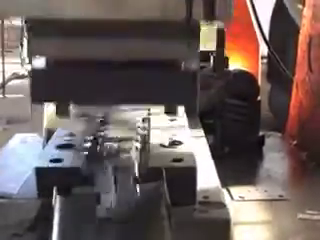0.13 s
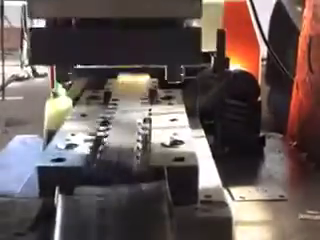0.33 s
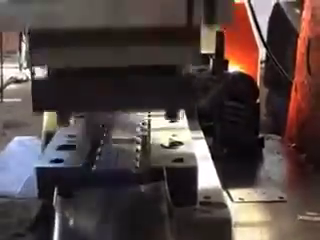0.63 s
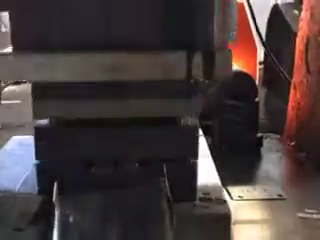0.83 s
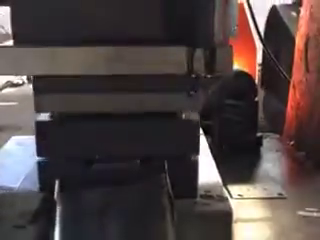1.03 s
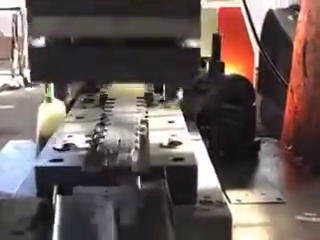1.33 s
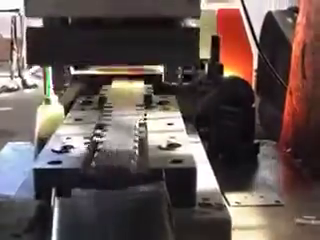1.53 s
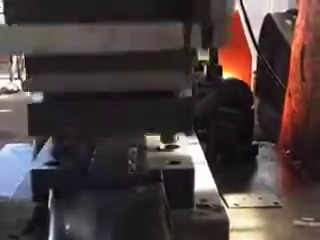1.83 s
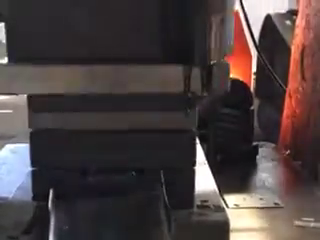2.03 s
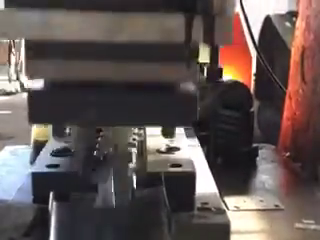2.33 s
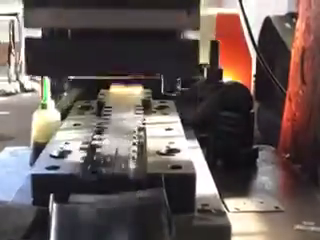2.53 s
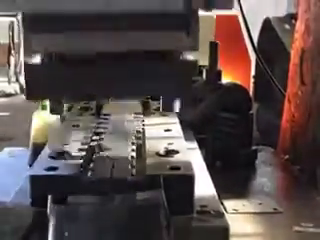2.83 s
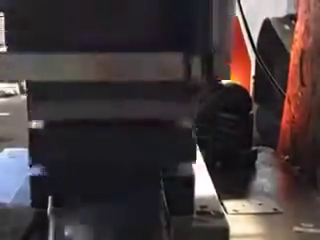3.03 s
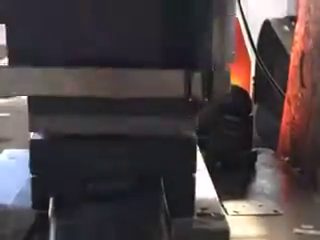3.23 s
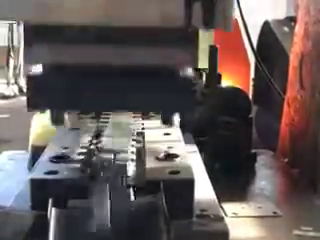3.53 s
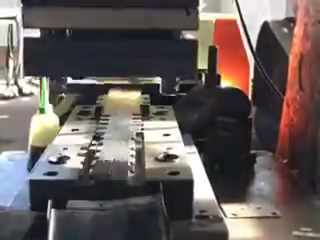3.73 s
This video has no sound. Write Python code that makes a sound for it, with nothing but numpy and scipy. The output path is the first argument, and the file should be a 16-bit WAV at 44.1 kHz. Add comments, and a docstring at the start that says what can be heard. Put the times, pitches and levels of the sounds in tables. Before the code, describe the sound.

A stamping press pounds rapidly, ram thudding and metal clanking, in a loud, echoing workshop.

```python
"""A loud workshop hall, close to a stamping press: the ram thuds into the die, linkages clank, punches and
feeder tick, small parts clink. These are bursts of noise in resonances that strike the modes of the steel.
Gears rattle under load as dense random clicks; late on, an air jet blows off as hiss and a falling whistle.
Shop din and motor whine are filtered noise. The hall smears the press, and a small microphone's fast
limiter holds the peaks down."""
import sys
import numpy as np
from scipy import signal
from scipy.io import wavfile
from scipy.ndimage import uniform_filter1d, minimum_filter1d

SR = 44100
rng = np.random.default_rng(int(sys.argv[2]) if len(sys.argv) > 2 else 0)


def dump_mix(stems):
    """Bounce the given channels to the path in sys.argv[1] as a 16-bit WAV at rate SR."""
    frames = np.atleast_2d(stems).T  # one column per channel
    limited = np.clip(frames, -1, 1)  # hard clip at full scale
    pcm = np.round(limited * 32767).astype(np.int16)
    wavfile.write(sys.argv[1], SR, pcm)


def invert_db(x):
    """Field ratio 10**(x/20) for x, a level in decibels (scalar or array-like)."""
    u = np.asarray(x, float) / 20
    return 10 ** u


N = 171990

# Modes of frame and die. Each row: pitch in Hz, relative level in dB, ring time to -60 dB in s.
STEEL_MODES = [(245.5, -4, 0.18), (372.1, -12.5, 0.21), (606, -8, 0.1), (699, -10.5, 0.065),
               (811, -31, 0.066), (1190, -18.5, 0.055), (1261, -13.5, 0.098), (1717, -11.5, 0.054),
               (1936, -23, 0.15), (2850, -15.5, 0.021), (3560, -14.5, 0.057), (4990, -23, 0.17),
               (6045, -27, 0.13)]


def rms_one(x):
    """Scale to rms 1."""
    return x / np.sqrt(np.mean(x ** 2) + 1e-20)


def in_time(rows):
    """Columns of a table as curves over all samples, level before the first row and after the last."""
    s, *columns = np.transpose(rows)
    return [np.interp(np.arange(N) / SR, s, c) for c in columns]


def drift(corner_hz):
    """Slow random wander of rms 1: noise through two equal poles, run at a 40th of the sample rate."""
    r = np.exp(-2 * np.pi * corner_hz * 40 / SR)
    noise = rng.standard_normal(N // 40 + 2002)
    slow = signal.lfilter([1], [1, -2 * r, r * r], noise)[2000:]  # settled part only
    return np.interp(np.arange(N) / 40, np.arange(len(slow)), rms_one(slow))


def lowpass(x, order, hz):
    """Butterworth low-pass."""
    return signal.sosfilt(signal.butter(order, hz, fs=SR, output="sos"), x)


def bandpass(x, low_hz, high_hz):
    """Butterworth band-pass."""
    return signal.sosfilt(signal.butter(2, [low_hz, high_hz], "band", fs=SR, output="sos"), x)


def resonance(x, hz, width_hz):
    """Two-pole peak of gain 1."""
    r = np.exp(-np.pi * width_hz / SR)
    return signal.lfilter([(1 - r * r) / 2, 0, (r * r - 1) / 2],
                          [1, -2 * r * np.cos(2 * np.pi * hz / SR), r * r], x)


def ring(clicks, hz, t60):
    """A unit click sets a dying sine of starting height 1 ringing."""
    r, w = invert_db(-60 / (t60 * SR)), 2 * np.pi * hz / SR
    return signal.lfilter([0, np.sin(w)], [1, -2 * r * np.cos(w), r * r], clicks + 1e-18)


def coloured(sources, spectrum, patchy_db):
    """Third-octave bands of two sources in turn, each with its level and flicker; rms 1 in all."""
    out = 0
    edges = 40 * 2 ** np.arange(0, 7.8, 1 / 3)
    hz, db = np.transpose(spectrum)
    for k, (low, high) in enumerate(zip(edges, edges[1:])):
        band = bandpass(sources[k % 2], low, high)
        band_db = np.interp(np.log(low * high) / 2, np.log(hz), db)
        out = out + band * invert_db(band_db + patchy_db * drift(10))
    return rms_one(out)


def blows(rows, t60, attack_s, width, boost_db, reach_oct):
    """Each blow is a dying chatter of contacts in a resonance and strikes the steel modes near its pitch."""
    steel_db, uneven_db = 1.5, 0.81
    out, t = np.zeros(N + SR), np.arange(SR // 2) / SR
    strikes = np.zeros((len(STEEL_MODES), N + SR))
    shape = (1 - np.exp(-t / attack_s)) * invert_db(-60 * t / t60)
    for s, db, hz in rows:
        chatter = rng.standard_normal(len(t)) * invert_db(2.2 * rng.standard_normal(len(t)))
        burst = shape * resonance(resonance(chatter, hz, width * hz), hz, width * hz)
        same_energy = np.sqrt(np.sum(shape ** 2) / np.sum(burst ** 2))
        i = int(s * SR)
        out[i:i + len(t)] += invert_db(db + boost_db) * burst * same_energy
        far = np.log2(np.array(STEEL_MODES)[:, 0] / hz) / reach_oct
        mode_db = db + steel_db + rng.normal(0, uneven_db, len(STEEL_MODES))
        strikes[:, i] += invert_db(mode_db) * np.exp(-far ** 2 / 2)
    steel = sum(invert_db(db) * ring(hit[:N], hz, rings_s)
                for hit, (hz, db, rings_s) in zip(strikes, STEEL_MODES))
    return out[:N] + steel


def shop_din():
    """Distant machines blur into noise whose bands flicker."""
    # Each row: frequency in Hz, relative density in dB per Hz.
    din_spectrum = [(50, -30.5), (200, 5), (300, -0.5), (700, -6.5), (1300, -7.5), (2450, -10.5),
                    (3600, -10), (4600, -19), (7500, -30)]
    return invert_db(-24) * coloured(rng.standard_normal((2, N)), din_spectrum, patchy_db=4.0)


def motor_whine():
    """Motors nearby whine steadily: noise in narrow resonances."""
    # Each row: pitch in Hz, level in dB.
    whine_tones = [(700, -33.5), (1267, -47)]
    return sum(invert_db(db) * rms_one(resonance(rng.standard_normal(N), hz, width_hz=12))
               for hz, db in whine_tones)


def jingle():
    """Loose scrap and strip edges jingle at random, at pitches spread over the treble; rms 1."""
    per_s, ring_cycles = 580, 100
    strength = invert_db(3.0 * np.minimum(rng.exponential(1, N), 2.5))
    born = strength * (rng.random(N) < per_s / SR)
    pitches_hz = np.geomspace(1500, 6800, 24)
    dealt = rng.integers(0, 24, N)  # which pitch each click sets ringing
    return rms_one(sum(ring(born * (dealt == k), hz, ring_cycles / hz) / np.sqrt(hz)
                       for k, hz in enumerate(pitches_hz)))


def drive():
    """Gear teeth rattle as dense, clumped contacts under load and keep the lower steel modes humming."""
    # Load on the drive. Each row: time in seconds, level of rattle, hum and jingle in dB.
    load_curve = [(0, -9), (.17, -21.5), (.28, -24.5), (.85, -25.5), (.92, -12), (1.3, -18), (1.5, -31.5),
                  (1.75, -19), (2.05, -18), (2.42, -14.5), (2.52, -33), (2.72, -30), (2.9, -16),
                  (3.04, -21), (3.1, -39), (3.21, -13), (3.52, -18.5), (3.75, -34), (3.9, -16)]
    # Each row: frequency in Hz, relative density in dB per Hz.
    rattle_spectrum = [(50, -45), (110, -10), (240, -12), (300, -5.5), (700, -6), (1300, -7.5), (2450, -23),
                       (3640, -20), (5900, -49.5), (7500, -35.5)]
    contacts_per_s, spread_db = 2500, 2
    clump_db, clump_corner_hz = 2.5, 25
    hum_db, hum_top_hz, jingle_db = -4.5, 2400, -14.5
    load_db, = in_time(load_curve)
    strength = invert_db(spread_db * rng.exponential(1, (2, N)))
    sign = rng.choice([-1, 1], (2, N))
    contacts = strength * sign * (rng.random((2, N)) < contacts_per_s / SR)
    contacts = contacts * invert_db(clump_db * drift(clump_corner_hz))
    hum = sum(invert_db(db) * rms_one(ring(contacts[0], hz, t60))
              for hz, db, t60 in STEEL_MODES if hz < hum_top_hz)
    rattle = coloured(contacts, rattle_spectrum, patchy_db=3.0)
    return invert_db(load_db) * (rattle + invert_db(hum_db) * hum + invert_db(jingle_db) * jingle())


def thuds():
    """Ram and frame thud: low, slow to rise, long to die."""
    # Each row: start in seconds, level in dB before the boost, pitch in Hz.
    thud_rows = [(0.009, -7, 213), (0.355, -6.5, 154), (0.595, -6, 362), (0.981, -1, 246),
                 (1.029, -4.5, 234), (1.727, -7, 365), (1.917, -21, 213), (2.061, -8.5, 377),
                 (2.14, -8.5, 236), (2.248, -4, 200), (2.857, -8, 352), (2.901, 1.5, 161), (2.937, 0, 192),
                 (3.02, -14.5, 232), (3.19, -5, 355), (3.27, -2, 246), (3.42, -7.5, 249), (3.853, -4, 193)]
    return blows(thud_rows, t60=0.26, attack_s=0.0078, width=0.68, boost_db=-8.5, reach_oct=0.26)


def clanks():
    """Linkage and die clank in a broad middle resonance."""
    # Each row: start in seconds, level in dB before the boost, pitch in Hz.
    clank_rows = [(0.031, -4.5, 414), (0.089, -13, 538), (0.392, -6.5, 526), (0.636, -6, 1500),
                  (0.66, -4, 1150), (0.774, -10, 680), (0.879, -3, 1300), (0.942, -2, 441),
                  (1.059, -3, 454), (1.149, -9.5, 527), (1.21, -5.5, 611), (1.365, -6.5, 1160),
                  (1.59, -3.5, 780), (1.778, -3.5, 1210), (1.998, -8.5, 730), (2.029, -6, 1140),
                  (2.285, -3, 404), (2.349, -6.5, 1260), (2.744, -10.5, 440), (2.768, -7, 1250),
                  (2.856, -11.5, 1170), (2.909, 5.5, 963), (3.118, -3, 440), (3.191, -13, 430),
                  (3.423, -4.5, 607), (3.467, -6, 440), (3.499, -6.5, 1210), (3.855, -11, 764)]
    return blows(clank_rows, t60=0.17, attack_s=0.0059, width=1.03, boost_db=-9.0, reach_oct=0.31)


def ticks():
    """Punches and feeder tick: sharp and bright, striking steel modes far around their pitch."""
    # Each row: start in seconds, level in dB before the boost, pitch in Hz.
    tick_rows = [(0.0358, -2, 2770), (0.1044, -2.5, 2640), (0.2907, -10.5, 2900), (0.9308, -26, 3440),
                 (1.006, -2, 3030), (1.058, -6.5, 3360), (1.218, -7.5, 3200), (1.5994, -11.5, 2950),
                 (1.9174, -15, 3500), (2.0894, -10.5, 3280), (2.1385, -2.5, 2850), (2.2488, -7, 2800),
                 (2.3351, -10.5, 3730), (2.3894, -9, 3020), (2.5794, -12.5, 3350), (2.9094, -6, 2820),
                 (3.465, -3.5, 2910), (3.5004, -10, 2700), (3.7025, -10, 3100), (3.8694, -12, 2630)]
    return blows(tick_rows, t60=0.17, attack_s=0.00089, width=1.21, boost_db=-13.5, reach_oct=0.85)


def clinks():
    """Small parts clink in a narrow resonance and strike only the steel modes close by."""
    # Each row: start in seconds, level in dB before the boost, pitch in Hz.
    clink_rows = [(.785, -33, 2850), (1.205, -20.5, 4990), (1.222, -16.5, 2850), (1.238, -18.5, 3820),
                  (1.24, -24.5, 4990), (1.59, -12, 811), (2.246, -19, 4990), (2.79, -26.5, 3560),
                  (2.98, -11, 699), (3.432, -22, 4990), (3.434, -18.5, 2850), (3.499, -23.5, 6045)]
    return blows(clink_rows, t60=0.077, attack_s=0.0012, width=0.032, boost_db=0.5, reach_oct=.08)


def jet():
    """Bright hiss with a band that stays and a whistling band that falls as the pressure drops."""
    # Each row: time in seconds, level in dB, whistle pitch in Hz.
    jet_curve = [(3.185, -50.5, 5950), (3.205, -29.5, 5826), (3.262, -28, 5690), (3.285, -25, 5234),
                 (3.36, -30, 4920), (3.43, -37, 4425), (3.75, -39, 3965)]
    whistle_width_hz, hiss_db = 300, -1.5
    nozzle_hz, nozzle_width_hz, nozzle_db = 5550, 720, -6
    db, hz = in_time(jet_curve)
    # slow noise on a gliding carrier makes a noise band around it
    low = lowpass(rng.standard_normal((2, N)), 2, whistle_width_hz / 2)
    turn = 2 * np.pi * np.cumsum(hz) / SR
    whistle = rms_one(low[0] * np.cos(turn) + low[1] * np.sin(turn))
    hiss = bandpass(rng.standard_normal(N), 4200, 7000)
    nozzle = resonance(resonance(hiss, nozzle_hz, nozzle_width_hz), nozzle_hz, nozzle_width_hz)
    return invert_db(db) * (whistle + invert_db(hiss_db) * rms_one(hiss) + invert_db(nozzle_db) * rms_one(nozzle))


def hall(x):
    """Dense diffuse echoes as dying noise of energy 1; the treble dies sooner."""
    t60_s, treble_t60_s, wall_cut_hz = 0.75, 0.42, 1800
    t, noise = np.arange(SR) / SR, rng.standard_normal(SR)
    low = lowpass(noise, 1, wall_cut_hz)
    answer = low * invert_db(-60 * t / t60_s) + (noise - low) * invert_db(-60 * t / treble_t60_s)
    answer = answer * (1 - np.exp(-t / 0.01))  # echoes build up
    return signal.fftconvolve(x, answer / np.sqrt(np.sum(answer ** 2)))[:N]


def scene():
    """Press and jet, direct and through the hall, over the shop din and motors."""
    press = thuds() + clanks() + ticks() + clinks() + drive() + jet()
    around = shop_din() + motor_whine()
    return (press + invert_db(-7) * hall(press) + around)[None]


def limiter(x):
    """Gain drops just ahead of each peak over the threshold, then recovers at a steady rate in dB."""
    threshold_db, release_db_per_s = -4.5, 157
    fall = release_db_per_s * np.arange(N) / SR
    over = np.maximum(20 * np.log10(np.abs(x) + 1e-9) - threshold_db, 0)
    held = np.maximum.accumulate(over + fall) - fall
    held = -minimum_filter1d(-held, size=41)  # largest cut within 20 samples either way
    return x * invert_db(-uniform_filter1d(held, size=41))


def band_limit(x):
    """A steep low-pass at the top of the band."""
    return signal.sosfilt(signal.butter(12, 7900, fs=SR, output="sos"), x)


def record(dry):
    """Small microphone with weak bass, fast limiter, then a steep treble limit."""
    x = signal.sosfilt(signal.butter(3, 141, "high", fs=SR, output="sos"), dry[0])
    x = limiter(x)
    x = signal.sosfilt(signal.cheby2(18, 55, 7617, fs=SR, output="sos"), x)  # 55 dB down from 7617 Hz
    return band_limit(x[None])


dry = scene()
out = record(dry)
dump_mix(out)
```